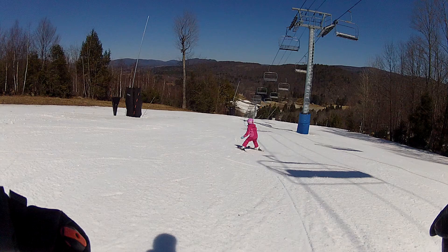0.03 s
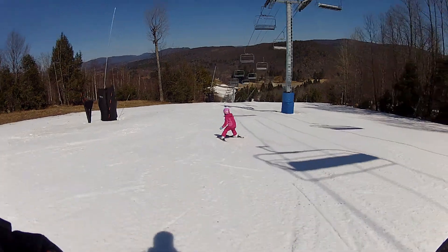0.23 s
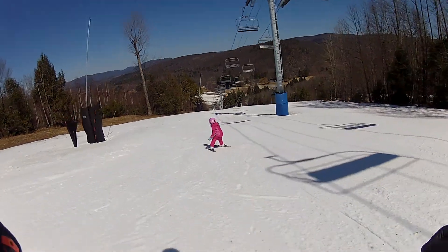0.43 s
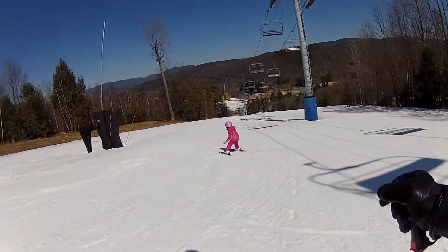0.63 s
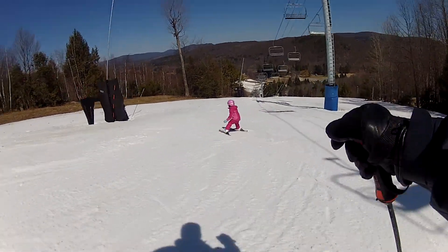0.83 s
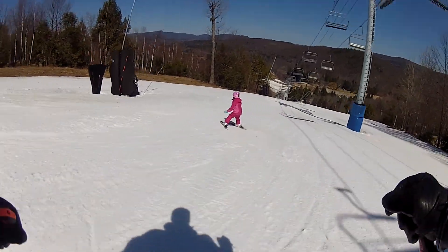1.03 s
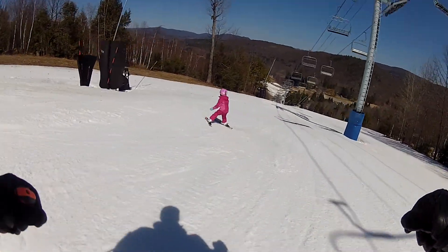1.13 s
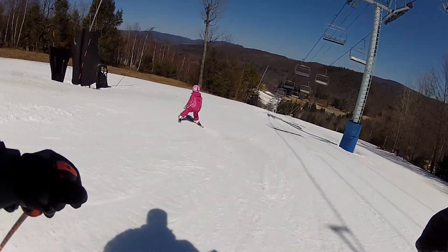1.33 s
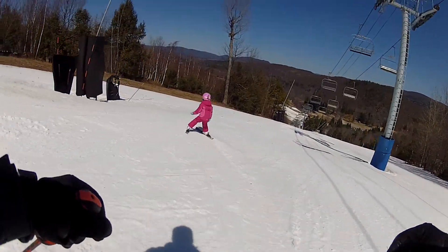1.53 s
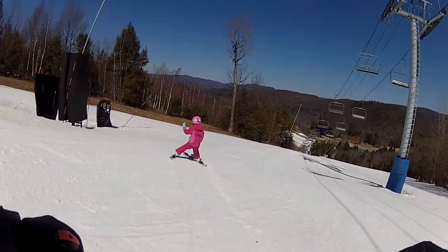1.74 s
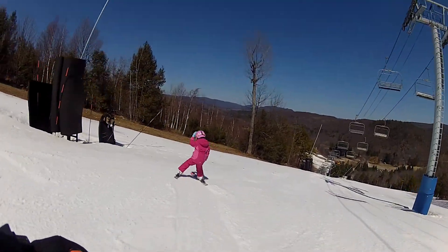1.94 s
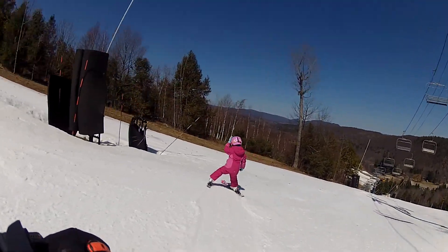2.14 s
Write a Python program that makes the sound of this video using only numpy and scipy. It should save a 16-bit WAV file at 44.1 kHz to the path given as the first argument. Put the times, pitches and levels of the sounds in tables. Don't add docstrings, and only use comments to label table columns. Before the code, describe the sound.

Skis scrape over groomed icy snow, gritty and swelling with each turn, while wind buffets the microphone

```python
import sys
import numpy as np
from scipy import signal
from scipy.fft import rfft, irfft
from scipy.io import wavfile
from scipy.ndimage import uniform_filter1d

SR = 44100
rng = np.random.default_rng(int(sys.argv[2]) if len(sys.argv) > 2 else 0)


def linear_from_db(decibels):
    return 10 ** (np.asarray(decibels, float) / 20)


def store_pcm(level_fs):
    pcm = np.round(np.clip(level_fs, -1, 1) * 32767).astype(np.int16)
    wavfile.write(sys.argv[1], SR, np.atleast_2d(pcm).T)


N = 95741
TIME_S = np.arange(N) / SR


def evened(x):
    return x / np.sqrt(np.mean(x ** 2) + 1e-20)


def shaped(x, points):
    table_hz, table_db = np.transpose(points)
    hz = np.fft.rfftfreq(len(x), 1 / SR)
    gain_db = np.interp(np.log(hz + 1), np.log(table_hz), table_db, -60, -60)
    return evened(irfft(rfft(x) * linear_from_db(gain_db), len(x)))


def curve(table, axis=1):
    rows = np.array(table)
    return np.interp(TIME_S, rows[:, 0], rows[:, axis])


def wobble(lo_hz, hi_hz):
    t = np.arange(0, N, 32) / SR
    rates_hz = np.geomspace(lo_hz, hi_hz, 30)
    sway = sum(np.sin(2 * np.pi * (hz * t + rng.random())) / np.sqrt(hz) for hz in rates_hz)
    return evened(np.interp(TIME_S, t, np.tanh(evened(sway) / 2)))


def resonate(x, hz, width_hz):
    return signal.lfilter(*signal.iirpeak(hz, hz / width_hz, SR), x)


def add(mix, start_s, sound):
    part = mix[round(start_s * SR):][:len(sound)]
    part += sound[:len(part)]


# (time_s, level_db, low_tilt_db per octave)
EDGE_LOAD = [(0.11, -42.5, -2.5), (0.2, -44.5, -7.5), (0.245, -49.5, -7), (0.33, -57.5, 6),
             (0.42, -50.5, -0.5), (0.53, -48, 0), (0.57, -45, -2), (0.7, -40.5, -5.5), (0.83, -35, 0),
             (0.92, -42, 2.5), (1.0, -51.5, -12), (1.12, -51.5, 1.5), (1.22, -49.5, -6), (1.38, -35, 2.5),
             (1.58, -41, 1), (1.75, -40.5, -2.5), (1.99, -40, 4), (2.08, -43.5, -1)]
# (pitch_hz, width_hz, level_db)
HOUSING_RINGS = [(1161, 168, -11), (1498, 106, -2.5), (1838, 178.3, -6), (1942.7, 145, 0.5),
                 (2290, 47, 2.5), (2535, 126, -3), (2697.2, 84.3, -4.5), (3026, 118, -3.5),
                 (3390, 125, -13), (3562, 163, -8), (4450, 98, -22.5)]
# (pitch_hz, level_db per Hz)
SNOW_SPRAY = [(150, -22.5), (400, -7.5), (850, -9), (1200, -3), (2500, 2.5), (3800, -4), (5000, -5.5),
              (5800, -10)]
# (time_s, length_s, change_db)
EDGE_SKIPS = [
    (1.634, .012, -6),
    (1.694, .011, -6),
    (0.476, .012, -3),
    (2.048, .014, -4),
    (1.476, .011, -3),
    (1.326, .009, -4),
]
GRAINS_PER_S, GRAIN_SPREAD_DB = 6000, 2.


def scrape():
    draw = rng.random((N, 2))
    hits = draw[:, 0] < GRAINS_PER_S / SR
    sizes = linear_from_db(-GRAIN_SPREAD_DB * np.log(draw[:, 1] + .01))
    grains = rng.standard_normal(N) * (.4 + hits * sizes)
    chatter_db = 1.2 * wobble(22, 80)
    grains = evened(grains * linear_from_db(chatter_db))
    tilt = curve(EDGE_LOAD, axis=2)
    rung = np.zeros(N)
    for k, (hz, width_hz, db) in enumerate(HOUSING_RINGS):
        clump_db = 1.5 * wobble(12, 50)
        ring = resonate(grains * linear_from_db(clump_db), hz, width_hz)
        rung += (-1) ** k * linear_from_db(db + tilt * np.log2(2160 / hz)) * ring
    skips_db = sum(db * np.exp(-((TIME_S - s) / length_s) ** 2) for s, length_s, db in EDGE_SKIPS)
    snow = evened(rung) + linear_from_db(-5) * shaped(grains, SNOW_SPRAY)
    return linear_from_db(curve(EDGE_LOAD) + skips_db) * evened(snow)


# (time_s, level_db)
WIND_GUSTS = [(0.11, -45), (0.15, -50), (0.24, -53.5), (0.44, -54), (0.65, -41.5), (0.77, -47.5),
              (0.9, -42), (1.02, -46), (1.2, -41), (1.29, -49.5), (1.32, -42.5), (1.73, -57), (1.78, -47.5),
              (2.03, -46), (2.12, -56), (2.17, -45.5)]
# (pitch_hz, level_db per Hz)
BUFFET_COLOUR = [(12, -4), (26, 3), (60, -7), (130, -17), (300, -24), (450, -37.5), (900, -41)]
# (pitch_hz, level_db per Hz)
FLUTTER_COLOUR = [(90, 8.5), (130, 4), (280, -3), (380, -13), (900, -19)]


def wind():
    lumps_db = 1.5 * wobble(3.94, 30)
    rumble = shaped(rng.standard_normal(N), BUFFET_COLOUR)
    buffet = linear_from_db(curve(WIND_GUSTS)) * evened(rumble * linear_from_db(lumps_db))
    flutter_db = -58 + .35 * (curve(EDGE_LOAD) + 43) + 2.2 * wobble(8, 50)
    return buffet + linear_from_db(flutter_db) * shaped(rng.standard_normal(N), FLUTTER_COLOUR)


# (pitch_hz, level_db per Hz)
SLOPE_HISS = [(300, -14.5), (900, -22), (1300, -3), (3500, 0), (5800, -4)]


def far_slope():
    return linear_from_db(-64) * shaped(rng.standard_normal(N), SLOPE_HISS)


# (start_s, peak_db, pitch_hz, broad_crunch_db)
EDGE_BITES = [(.106, -31, 3087, -9), (.126, -29.5, 2360, -2), (.22, -31, 1860, -10), (.49, -39, 2810, -6),
              (.511, -37, 2970, 7), (.546, -30, 2610, -8), (.566, -35, 2700, -12), (.608, -32, 2660, -8),
              (.72, -30.5, 2270, -1.5), (.782, -24.5, 2285, -8), (.848, -28, 2280, -6),
              (.91, -28.5, 2607, 5), (1.129, -33, 3460, 12), (1.158, -33.5, 2690, -5.5),
              (1.2185, -30.5, 1450, -3), (1.247, -29.5, 1460, 6), (1.303, -27, 1880, -5.5),
              (1.338, -32, 1920, 3), (1.412, -27, 2290, -3), (1.487, -26, 1845, 6), (1.547, -27, 2490, -2),
              (1.609, -27.5, 2290, -22), (1.66, -25, 2220, -20), (1.711, -30, 2197, -3.5),
              (1.82, -31.5, 1310, -3), (1.838, -29.5, 1270, 2.5), (1.995, -32, 1500, 0),
              (1.932, -33, 2280, 8), (2.066, -34.5, 2310, -15)]
BITE_RISE_S, BITE_FALL_S, BITE_WIDTH_HZ = 0.0059, .011, 210


def bites():
    out, t = np.zeros(N), np.arange(2600) / SR
    rise = np.sin(np.pi / 2 * np.minimum(t / BITE_RISE_S, 1)) ** 2
    shape = rise * np.exp(-t / BITE_FALL_S)
    for start_s, peak_db, hz, broad_db in EDGE_BITES:
        noise = rng.standard_normal(len(t))
        pitched = evened(resonate(noise, hz, BITE_WIDTH_HZ))
        crunch = pitched + linear_from_db(broad_db - 4) * shaped(noise, SNOW_SPRAY)
        add(out, start_s, linear_from_db(peak_db - 5) * shape * evened(crunch))
    return out


# (start_s, peak_db)
POLE_TICKS = [
    (0.424, -29.5),
    (0.4312, -33.5),
    (0.445, -39.5),
]
# (pitch_hz, level_db, time to fade by 60 dB_s)
TICK_RINGS = [(2990, 2, .045), (2760, -6.5, 0.04), (2235, -7.5, 0.025), (3700, -13, .02)]


def pole_ticks():
    out, t = np.zeros(N), np.arange(4000) / SR
    rings = sum(linear_from_db(db - 60 * t / fade_s) * np.sin(2 * np.pi * hz * t) for hz, db, fade_s in TICK_RINGS)
    tick = rings * np.minimum(t / .001, 1)
    for start_s, peak_db in POLE_TICKS:
        add(out, start_s, linear_from_db(peak_db) * tick)
    return out


# (start_s, peak_db, pitch_hz, snap_db)
HARNESS_KNOCKS = [(0.5185, -31, 195, -2), (0.497, -41, 230, -10), (0.668, -41, 150, -8),
                  (0.813, -38, 115, -12), (0.885, -41, 200, -8), (1.132, -39, 140, -14),
                  (1.595, -40, 90, -20), (.385, -50, 200, 2), (.838, -41, 270, -12), (1.03, -44, 220, -20)]
KNOCK_FADE_S, SNAP_S = .03, .0002


def harness_knocks():
    out, t = np.zeros(N), np.arange(4000) / SR
    snap = np.exp(-(t / SNAP_S - 3) ** 2)
    fade = linear_from_db(-60. * t / KNOCK_FADE_S) * np.minimum(t / .002, 1)
    for start_s, peak_db, hz, snap_db in HARNESS_KNOCKS:
        swing = -fade * np.sin(2 * np.pi * hz * (t - .0013))
        add(out, start_s, linear_from_db(peak_db) * (2 * swing + linear_from_db(snap_db + 2) * snap))
    return out


# (pitch_hz, width_hz, share removed)
HOUSING_DIPS = [(1620, 80, 0.37), (2433, 43, 0.985), (2930, 37, 0.37), (3365, 69, 0.37), (4272, 250, 0.58)]


def housing_dips(near):
    for hz, width_hz, share in HOUSING_DIPS:
        near = near - np.clip(share, 0, 1) * resonate(near, hz, width_hz)
    return near


def scene():
    near = housing_dips(scrape() + bites())
    return (near + wind() + far_slope() + pole_ticks() + harness_knocks())[None]


START_S = 0.10515
HOLD_HZ = 12000


def held_samples(x):
    blocks = N // 147 + 2
    x = np.pad(x, (0, blocks * 147 - N))
    hz = np.fft.rfftfreq(len(x), 1 / SR)
    x = irfft(rfft(x) * np.clip((5925 + 150 - hz) / 150, .3, 1), len(x))
    slow = signal.resample(x, blocks * 147 * HOLD_HZ // SR)
    return signal.resample(np.repeat(slow, 4), len(x))


# (pitch_hz, limit_db)
SILENCE_LIMIT = [(4800, -46), (6000, -40.5), (7200, -48), (10300, -28), (12000, -41.5), (13200, -43),
                 (15000, -32), (15600, -16)]


def dropped(x):
    hz, t, z = signal.stft(x, SR, nperseg=1918)
    power = (abs(z) ** 2).reshape(80, 12, -1).mean(1)
    band_db = np.repeat(10 * np.log10(power + 1e-20), 12, axis=0)
    loud_db = uniform_filter1d(band_db[(hz > 1000) & (hz < 3500)].mean(0), size=3) + 10
    scatter_db = 2. * np.repeat(rng.standard_normal((len(t), 80)).T, 12, axis=0)
    limit_db = np.repeat(np.interp(hz[6::12], *np.transpose(SILENCE_LIMIT), -200), 12)[:, None] + scatter_db
    kept = np.clip((band_db - loud_db - limit_db) / 2, 0, 1)
    return signal.istft(z * kept, SR, nperseg=1918)[1][:len(x)]


def roll_off(x):
    return signal.sosfilt(signal.butter(12, 16500, fs=SR, output="sos"), x)


def record(dry):
    heard = dry[0] * (np.arange(N) > START_S * SR)
    out = dropped(held_samples(heard))[:N]
    out = out * np.clip((TIME_S - START_S) / .002 + 1, 0, 1)
    return roll_off(out[None])


dry = scene()
out = record(dry)
store_pcm(out)
```